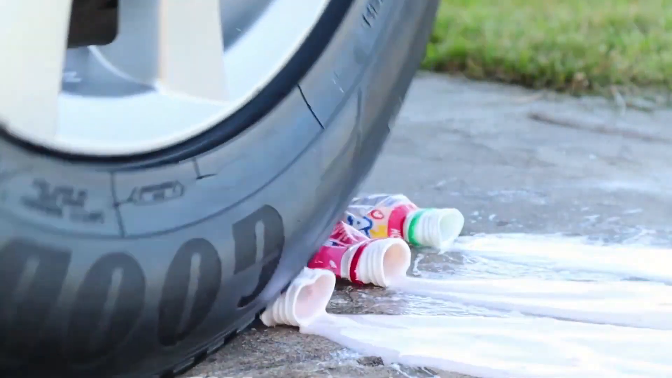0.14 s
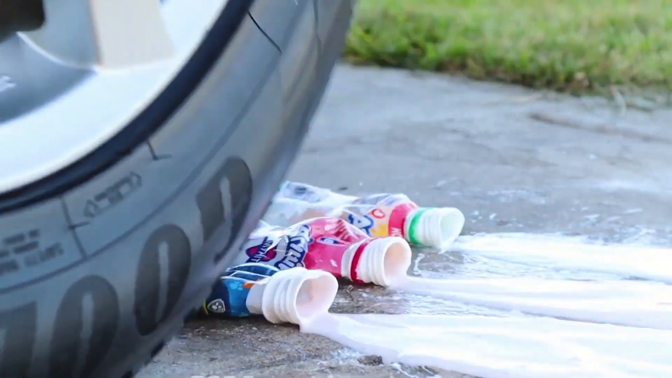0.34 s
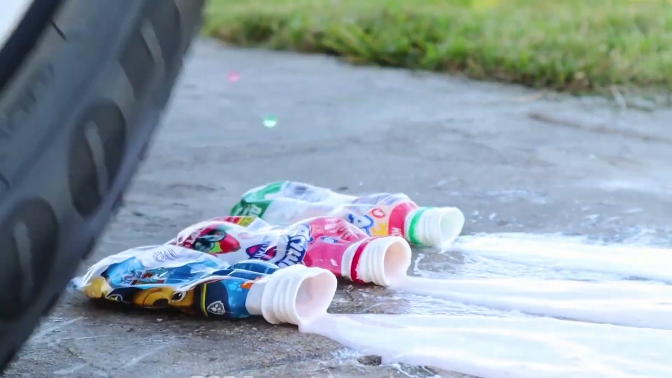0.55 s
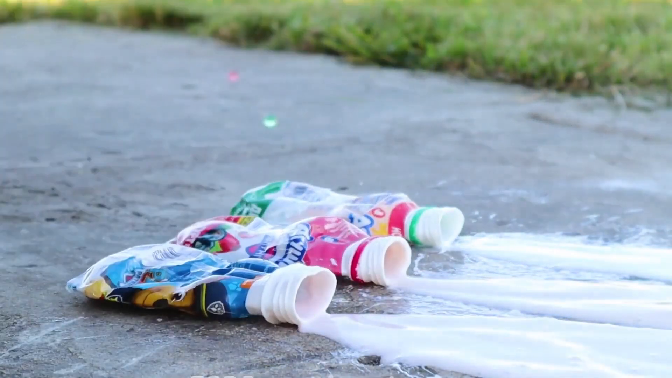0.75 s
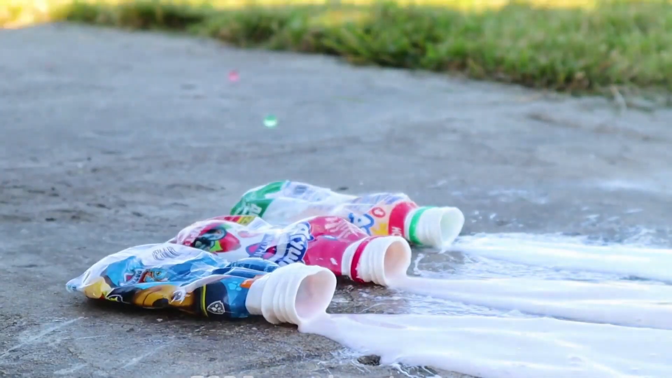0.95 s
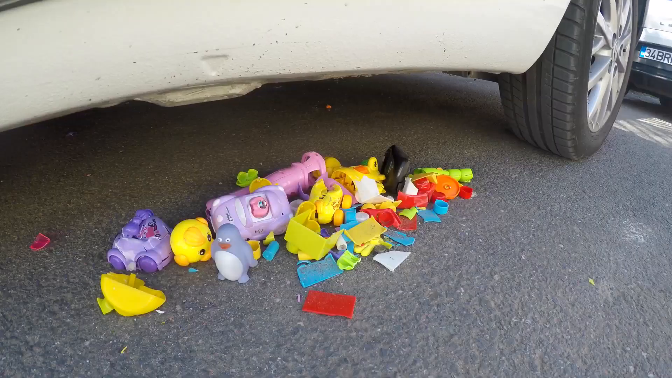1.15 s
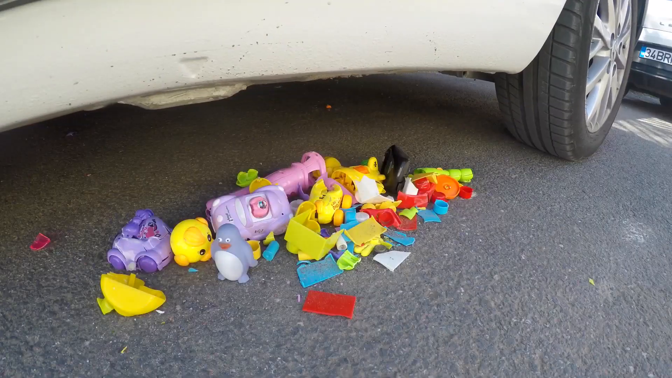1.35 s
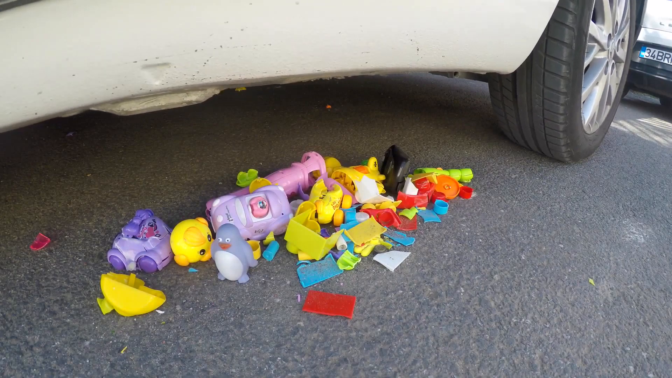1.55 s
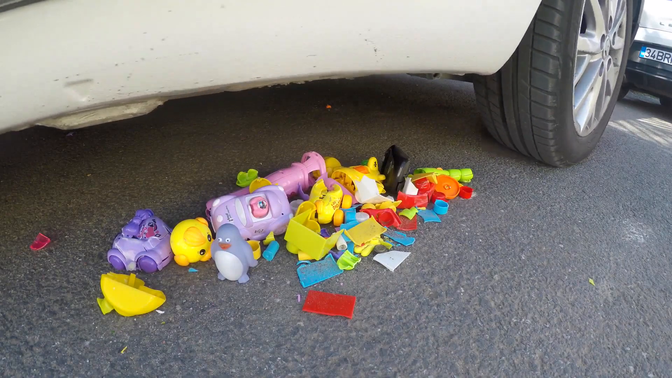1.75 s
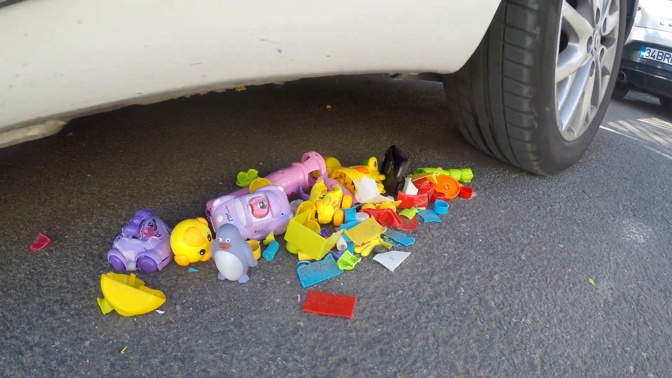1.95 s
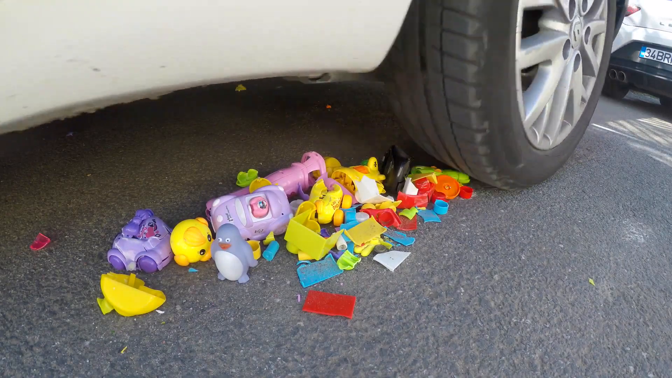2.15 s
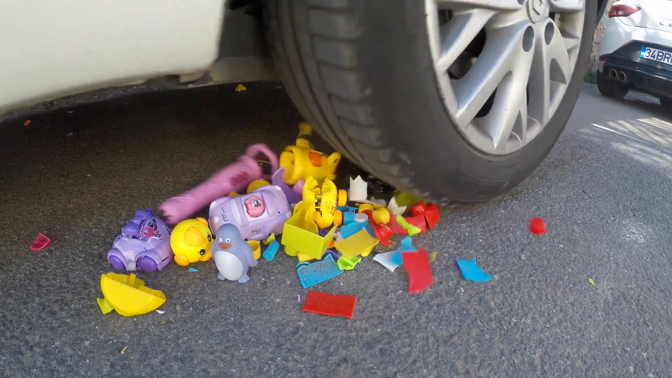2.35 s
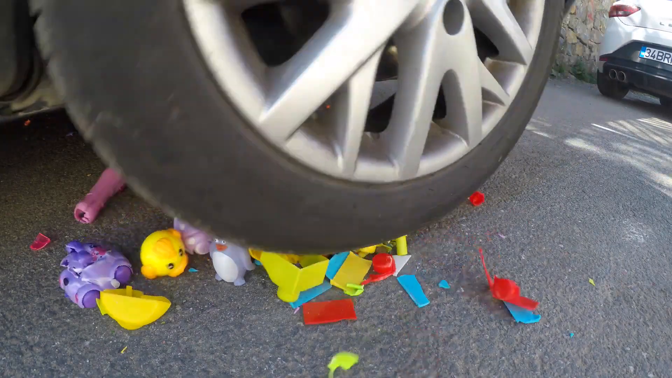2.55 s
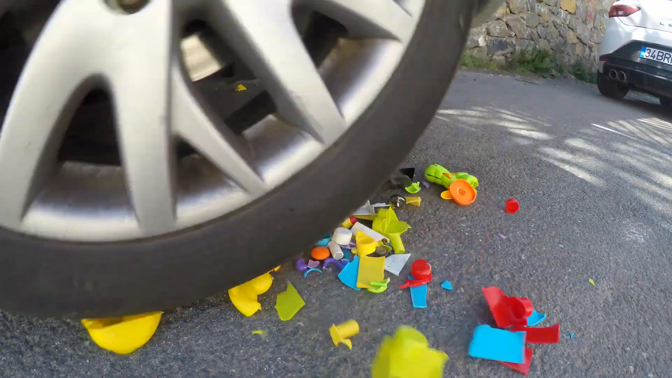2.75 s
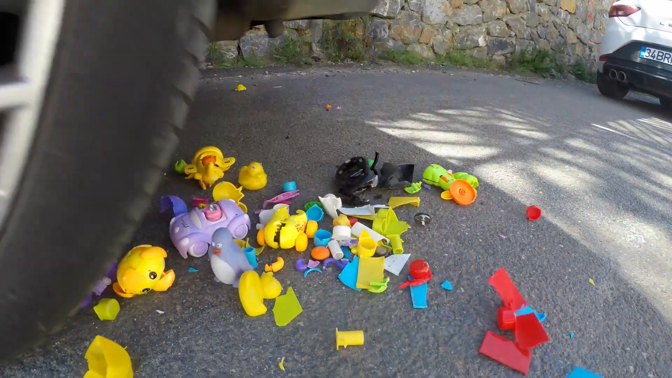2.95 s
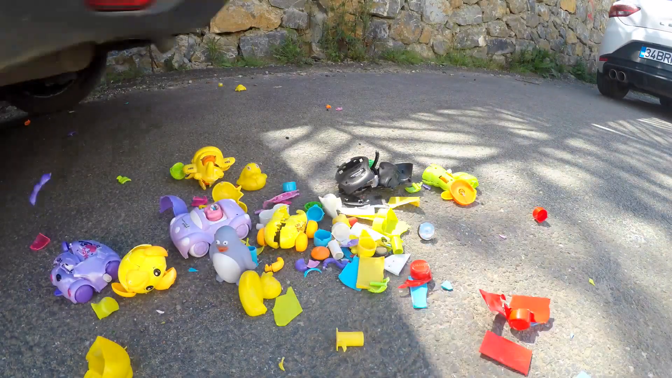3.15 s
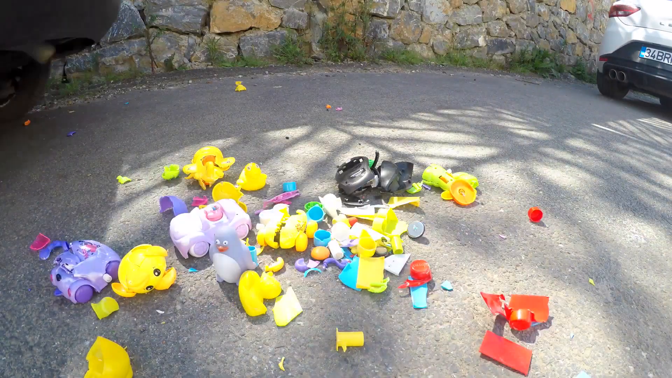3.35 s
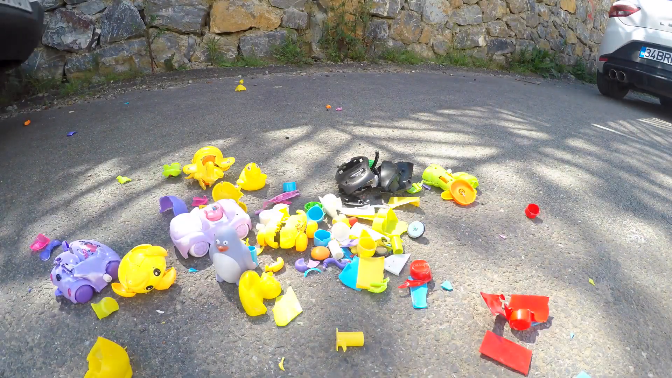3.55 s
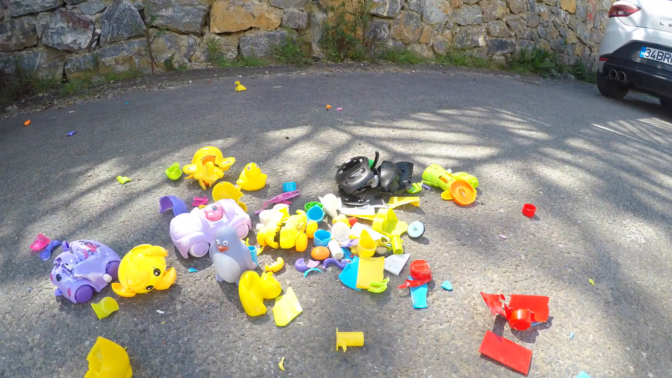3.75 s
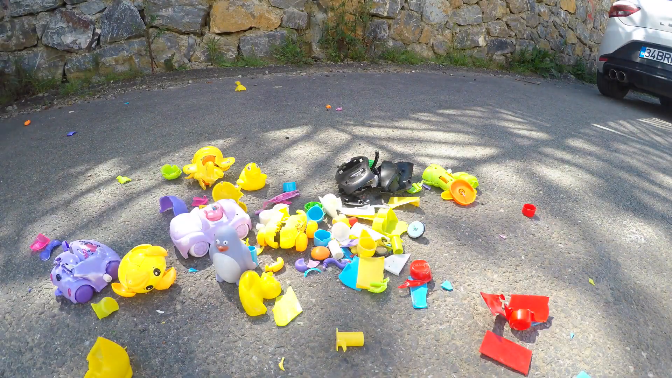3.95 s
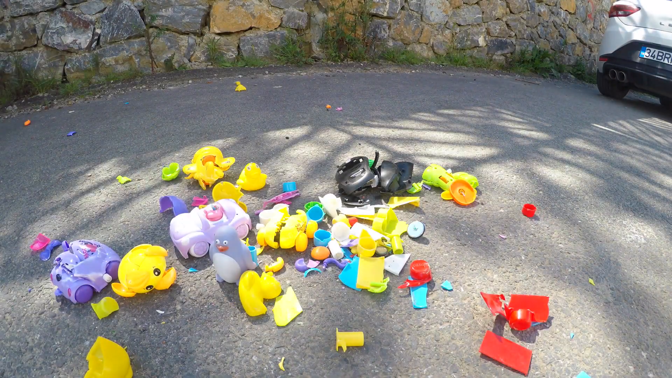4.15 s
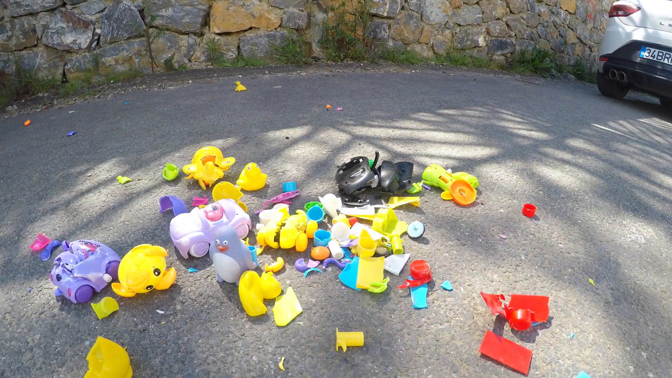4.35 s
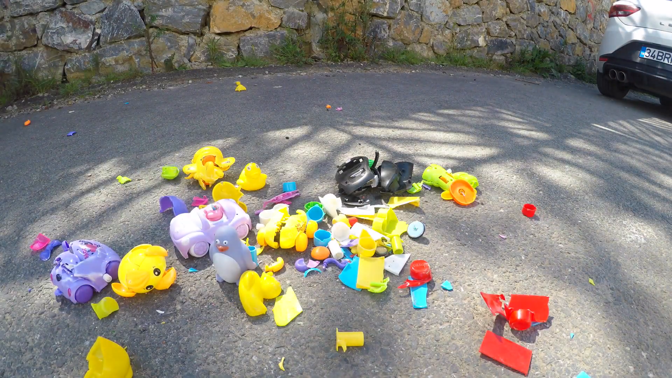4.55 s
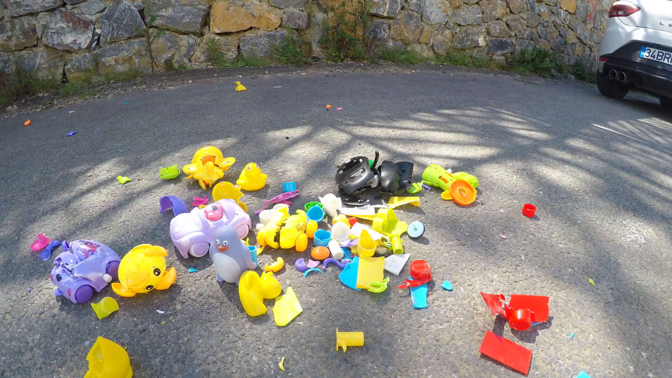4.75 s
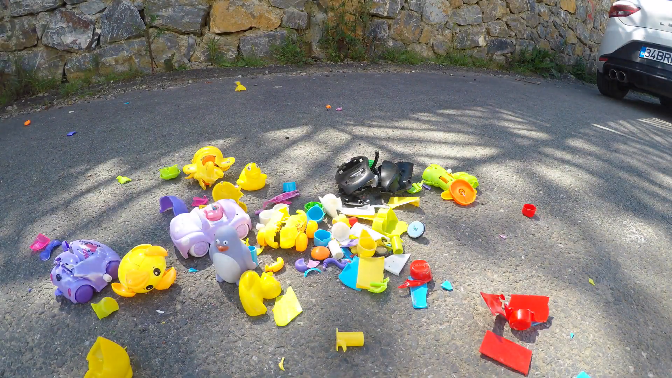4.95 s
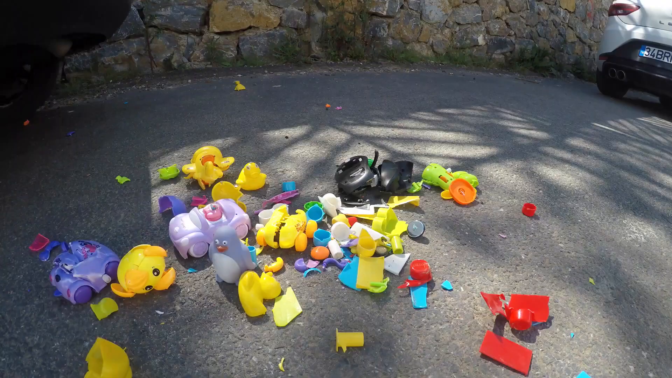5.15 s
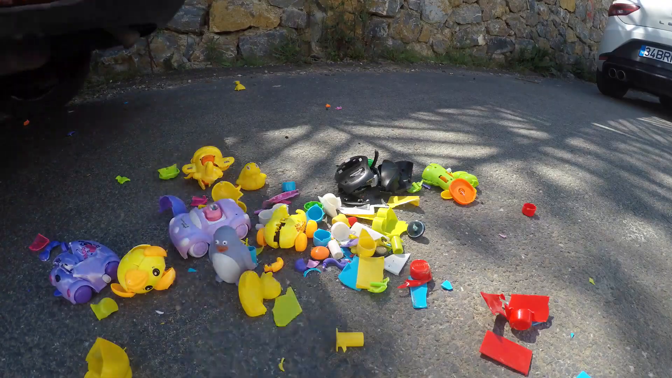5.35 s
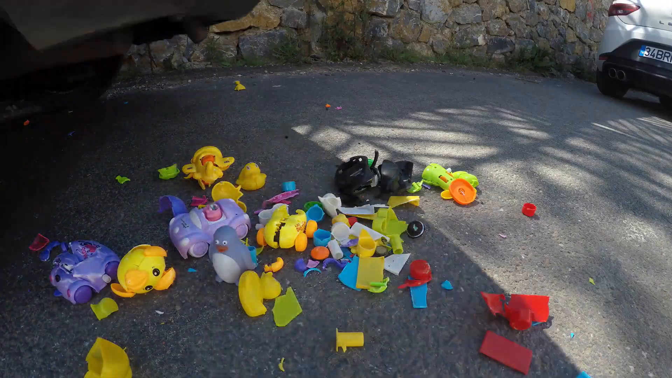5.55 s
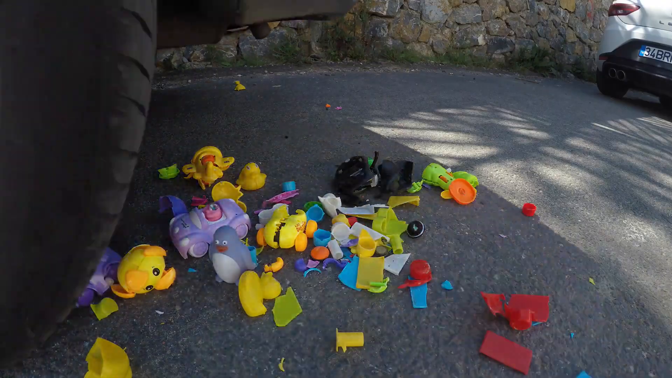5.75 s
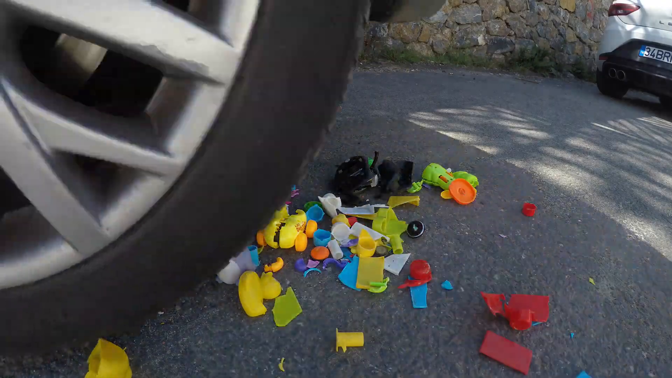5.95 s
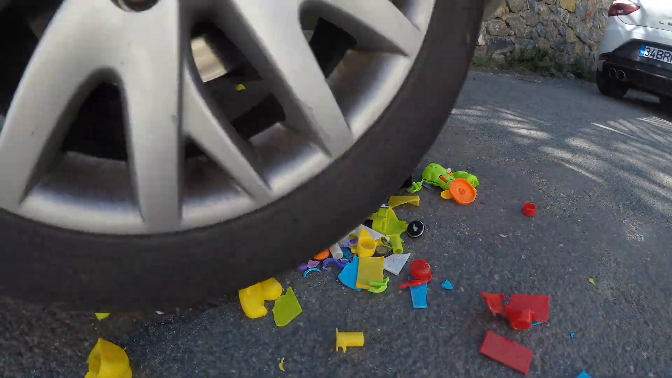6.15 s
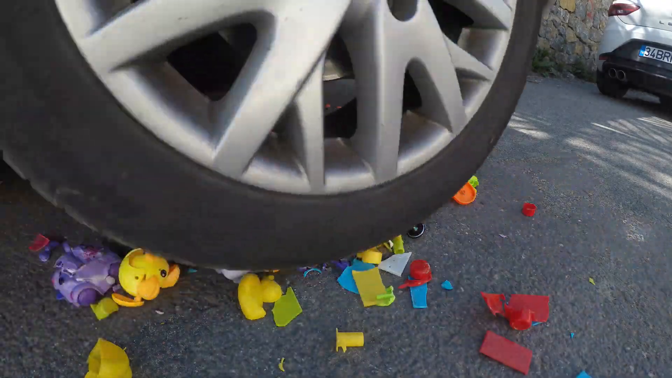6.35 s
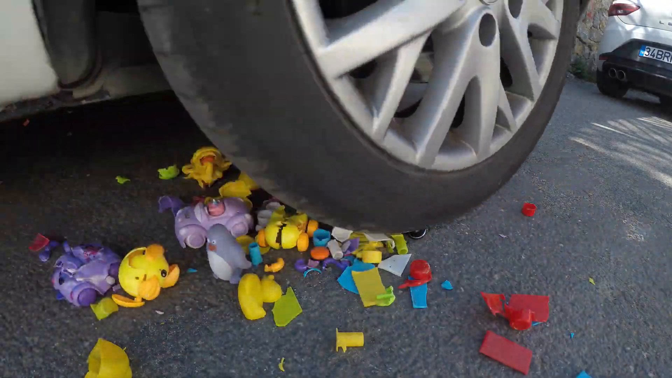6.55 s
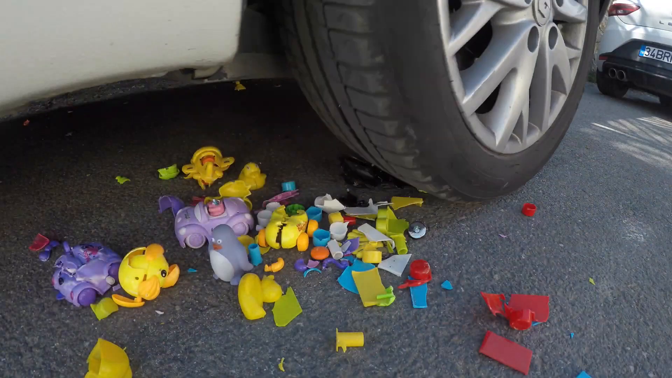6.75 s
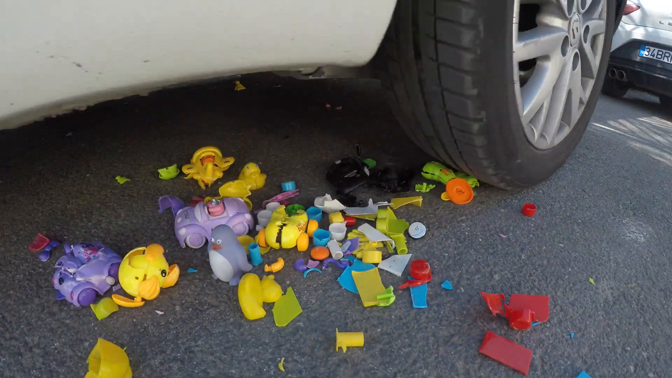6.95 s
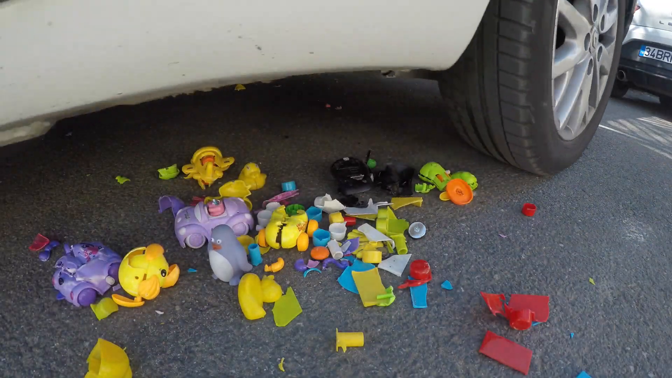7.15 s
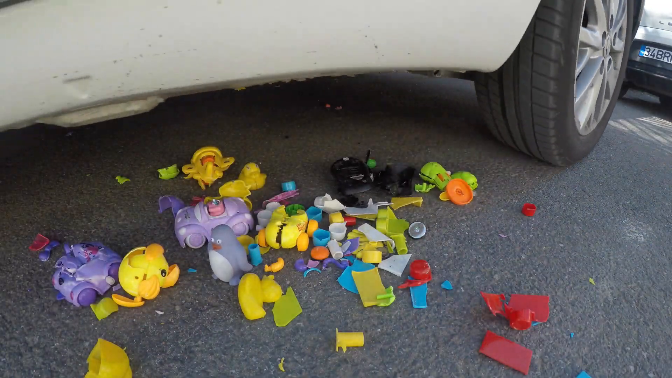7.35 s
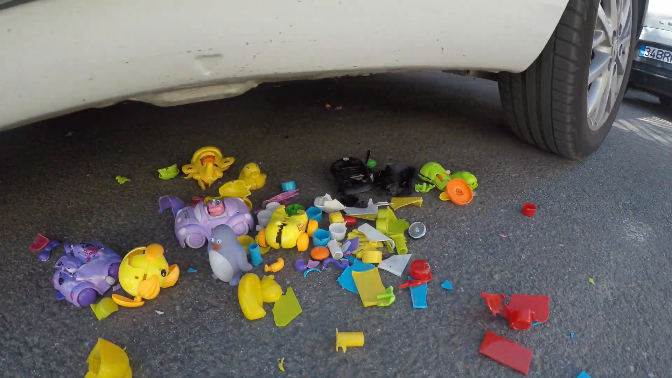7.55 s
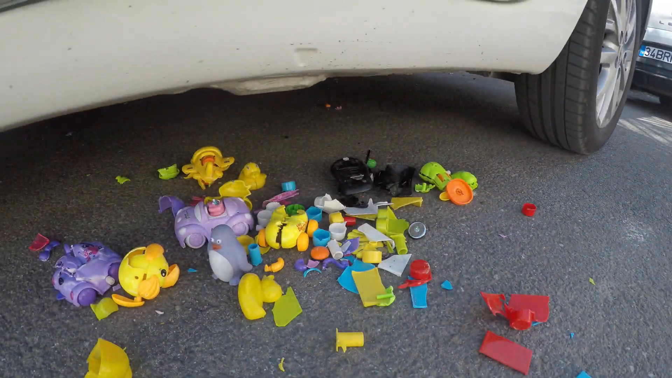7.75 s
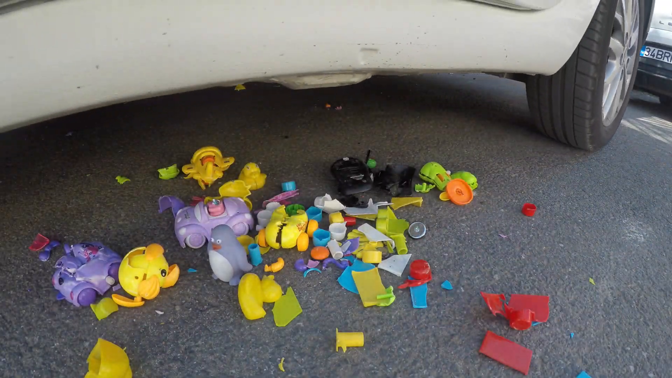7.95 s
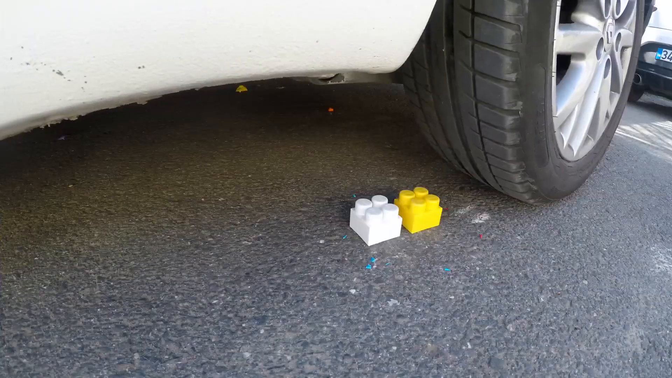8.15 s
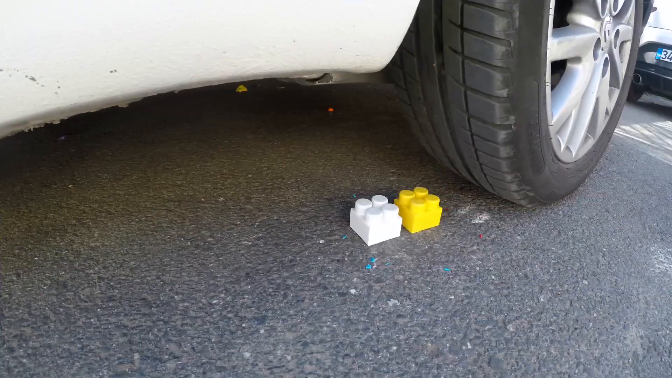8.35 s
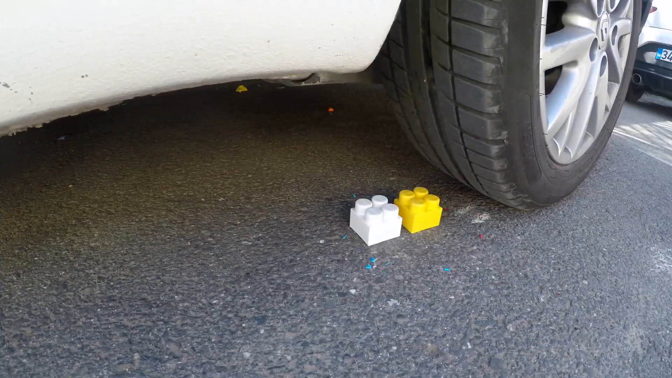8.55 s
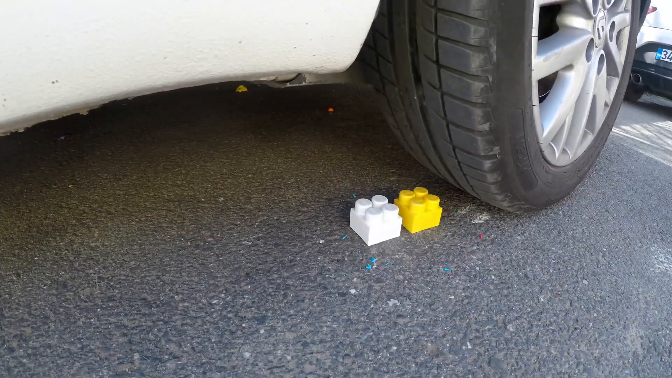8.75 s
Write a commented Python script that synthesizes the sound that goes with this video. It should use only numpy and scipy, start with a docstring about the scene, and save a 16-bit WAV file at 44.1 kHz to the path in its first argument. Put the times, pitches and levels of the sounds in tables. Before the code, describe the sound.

Hard plastic cracks, snaps and crunches under a slow car tyre on asphalt, with hollow thuds, skipping shards and faint idling engine between passes.

```python
"""Hard plastic toys crack and crunch under a car tyre: snaps, knocking shells, thuds, pops and skipping shards.
First the tyre rolls off flattened drink bottles on wet asphalt; in three further cuts, parted by brief
silences, an idling car rolls over a heap of toys and back again. Fractures are noise bursts and short
rings; hollow pieces are dying sines; exhaust puffs are pulses ringing the pipe; engine clatter, grit, wet
fizz and street are coloured noise. The toys, tyre and engine reach two close microphone ports."""
import sys
import numpy as np
from scipy import signal
from scipy.fft import rfft, irfft, next_fast_len
from scipy.io import wavfile
from scipy.ndimage import uniform_filter1d

SR = 44100
rng = np.random.default_rng(int(sys.argv[2]) if len(sys.argv) > 2 else 0)


def generate_wav(sig):
    """Save sig (samples, or channels by samples) to the path in sys.argv[1] as 16-bit PCM at SR."""
    pcm = np.round(np.clip(np.atleast_2d(sig).T, -1, 1) * 32767).astype(np.int16)
    wavfile.write(sys.argv[1], SR, pcm)


N = 388962

# The cuts that sound. Each row: start in seconds, end in seconds.
SHOTS = [(-.1, 1.121), (1.157, 5.157), (5.165, 7.985), (8.03, 9.01)]
CYCLE_S = .1024  # one engine cycle, three firings


def amp(db):
    """Decibels to amplitude."""
    return 10 ** (np.asarray(db) / 20)


def evened(x):
    """Scales each row to an RMS of one."""
    return x / np.sqrt(np.mean(x ** 2, -1, keepdims=True) + 1e-20)


def read(points, hz):
    """Reads a table of (Hz, value) along a logarithmic frequency axis."""
    f, value = np.transpose(points)
    return np.interp(np.log(hz + 1), np.log(f + 1), value)


def curves(tables):
    """A softened on/off gate over the tables' time spans, then each table column at every sample."""
    t, rows = np.arange(N) / SR, np.concatenate(tables)
    on = sum((t >= table[0][0]) & (t < table[-1][0]) for table in tables)
    columns = [np.interp(t, rows[:, 0], column) for column in rows.T[1:]]
    return uniform_filter1d(on * 1., 400), *columns


def colour(x, gain):
    """Filters by a gain given as a function of frequency."""
    size = next_fast_len(x.shape[-1])
    shaped = rfft(x, size) * gain(np.fft.rfftfreq(size, 1 / SR))
    return irfft(shaped, size)[..., :x.shape[-1]]


def lowpass(hz, corner_hz):
    """Gain that falls steeply above the corner."""
    return 1 / (1 + (hz / corner_hz) ** 4)


def ring(x, hz, width):
    """Two-pole resonance, its width in Hz."""
    r = np.exp(-np.pi * width / SR)
    return signal.lfilter([1, 0, -1], [1, -2 * r * np.cos(2 * np.pi * hz / SR), r * r], x)


def splinters(hz, noise, width):
    """Noise ringing through two equal resonances in a row; each width is a share of the pitch."""
    return evened(ring(ring(noise, hz, width * hz), hz, width * hz))


def blip(t, hz, rise):
    """A tone that swells to its top over some cycles and soon dies."""
    u = t * hz / max(rise, .2)
    return u ** 2 * np.exp(2 - 2 * u) * np.sin(2 * np.pi * hz * t)


def place(x, pan_db):
    """Pans by a left-right level difference."""
    return x * amp(np.array([pan_db / 2, -pan_db / 2]).reshape(2, -1))


def add(mix, s, sound):
    """Adds a sound to the mix at a time in seconds."""
    part = mix[:, max(round(s * SR), 0):][:, :sound.shape[1]]
    part += sound[:, :part.shape[1]]


def sparse_hits(per_s, spread_db):
    """Single-sample hits at random times and of uneven size."""
    return amp(spread_db * np.minimum(rng.exponential(1, N), 4)) * (rng.random(N) < per_s / SR)


def grains(per_s, spread_db, t60, wash):
    """Sparse snaps of uneven size, each a dying burst of noise, over a steady wash."""
    hits = sparse_hits(per_s, spread_db)
    burst = signal.oaconvolve(hits, amp(-60 * np.arange(2000) / SR / t60))[:N]
    return (evened(burst) + wash) * rng.standard_normal(N)


def chips(per_s, spread_db, lo_hz, hi_hz, cycles, count):
    """Sparse fractures of uneven size; each rings one of several small pieces for a few cycles."""
    hits = sparse_hits(per_s, spread_db) * rng.choice([-1, 1], N)
    piece = rng.integers(0, count, N)
    total = 0
    for k, hz in enumerate(np.geomspace(lo_hz, hi_hz, count)):
        total = total + evened(ring(hits * (piece == k), hz, hz / cycles)) * np.sqrt(hz)
    return evened(total)


def patchy(x, depth_db):
    """Random louder and softer patches, some 400 Hz by 40 ms."""
    z = signal.stft(x, nperseg=512)[2]
    patches = uniform_filter1d(rng.standard_normal(z.shape), size=5, axis=0)
    patches = uniform_filter1d(patches, size=7, axis=1)
    return signal.istft(z * amp(depth_db * patches / np.std(patches)), nperseg=512)[1][:N]


def crunchy(x, s, lo_hz):
    """Colour of breaking plastic at time s: whole pieces early on, fragments later."""
    # Spectra of whole pieces splitting and of fragments. Each row: frequency in Hz, density in dB per Hz.
    whole_spectrum = [(530, -36.5), (900, -8), (1850, 0), (2220, -11), (3040, -2), (4860, -3.5),
                      (6480, -0.5), (11400, -24), (13500, -24), (16000, -50)]
    fragment_spectrum = [(880, -28), (1500, -7), (1780, 8), (2230, -9), (2720, -17.5), (3060, -4),
                         (6500, -0.5), (11400, -27.5), (13500, -19), (14800, -28.5), (16000, -60)]
    whole_until_s = 4

    def broken(spectrum):
        return evened(colour(x, lambda hz: amp(read(spectrum, hz)) / (1 + (lo_hz / (hz + 1)) ** 6)))

    return np.where(s < whole_until_s, broken(whole_spectrum), broken(fragment_spectrum))


def street():
    """Faint steady outdoor murmur: coloured noise."""
    # Murmur spectrum. Each row: frequency in Hz, density in dB per Hz.
    murmur = [(15, -47.5), (25, -17.5), (90, -0.5), (247, 0), (385, -13), (645, -11.5), (1060, -17),
              (1950, -13.5), (2760, -28.5), (9000, -37.5), (11700, -64), (19800, -120)]
    level_db = -76.5
    return amp(level_db) * evened(colour(rng.standard_normal(N), lambda hz: amp(read(murmur, hz))))


def exhaust():
    """Each cycle one strong suction pulse that sets the pipe ringing; two weaker firings follow."""
    # First strong puff in each cut with the engine running, in seconds.
    first_puffs = [1.174, 5.2342, 8.0496]
    # Puff strength over time. Each row: time in seconds, level in dB.
    strength = [(1.15, -91.5), (1.17, -56), (1.58, -46), (1.89, -35), (2.1, -54.5), (3.1, -60.5),
                (3.64, -55), (3.73, -43.5), (4.14, -40.5), (4.55, -47), (4.68, -38.5), (5.1, -42.5),
                (5.2, -78.5), (5.55, -72), (5.9, -43), (7.0, -45), (7.95, -43), (8.04, -83.5), (8.68, -67),
                (8.76, -53)]
    pipe_hz, pipe_t60_s, pipe_ring_db = 104, .06, -6
    strong_spread_db, weak_db, weak_spread_db = 3.5, -21, 4.5
    rumble_db = -21.5  # gas rumbling in the pipe, against the puff level

    out, from_puff = np.zeros((1, N)), np.arange(-441, 2600) / SR
    u, after = from_puff / .0019, np.maximum(from_puff, 0)
    suction = (.5 * u ** 2 - 1.2) * np.exp(-u ** 2 / 2)
    pipe = np.exp(-after * 400) - np.cos(2 * np.pi * pipe_hz * after)
    pulse = (suction + amp(pipe_ring_db - 60 * after / pipe_t60_s) * pipe)[None]

    times = np.concatenate([np.arange(s, end, CYCLE_S) for s, (_, end) in zip(first_puffs, SHOTS[1:])])
    # the pulse centre lies 441 samples after its start
    for s, uneven in zip(times - 441 / SR, rng.standard_normal((len(times), 3))):
        db = np.interp(s, *np.transpose(strength))
        add(out, s, amp(db + strong_spread_db * uneven[0]) * pulse)
        for k in (1, 2):
            add(out, s + k * CYCLE_S / 3, amp(db + weak_db + weak_spread_db * uneven[k]) * pulse)
    rumble = evened(ring(ring(rng.standard_normal(N), 90, 170), 90, 170))
    return out[0] + amp(np.interp(np.arange(N) / SR, *np.transpose(strength)) + rumble_db) * rumble


def engine():
    """Valve and combustion clatter ringing the underbody, throbbing with the firings; grit under the slow tread."""
    # One table a stretch between passes. Each row: time in seconds, clatter level in dB,
    # left-right difference in dB, grit hiss level in dB.
    idle = [
        [(1.157, -42, 1, -63), (1.323, -41.5, -2.5, -65), (1.573, -42.5, 7, -68.5), (1.799, -41, 12, -64),
         (2.019, -40.5, 11.5, -56.5), (2.1, -46, 16, -64)],
        [(2.98, -53.5, -3, -49), (3.08, -77.5, 14, -67), (3.26, -80, 7.5, -91), (3.32, -78, 2, -99),
         (3.75, -70.5, -5, -71.5), (4.16, -58, -5, -61.5), (4.5, -58.5, -5.5, -72), (4.96, -63.5, 11, -74.5),
         (5.16, -65.5, 8, -74)],
        [(5.19, -101.5, -0.5, -98), (5.604, -79, 1.5, -89.5), (5.7, -63.5, 0, -96)],
        [(6.98, -49, 12.5, -74), (7.164, -52.5, 22, -68.5), (7.406, -46, 18.5, -65), (7.426, -47.5, 20.5, -65),
         (7.818, -46, 15.5, -59.5), (7.985, -50, 25.5, -61.5)],
        [(8.03, -83, -1, -88.5), (8.262, -77, 1, -87.5), (8.718, -61.5, -2, -81), (8.82, -65, -1, -79)],
    ]
    # Clatter and grit spectra. Each row: frequency in Hz, density in dB per Hz.
    clatter_spectrum = [(24, -49.5), (40, -22), (108, -20.5), (182, -17.5), (270, -13.5), (464, -9.5),
                        (614, -5.5), (727, -5.5), (829, -6.5), (999, -20), (1180, -23), (1450, -27),
                        (1890, -22.5), (2190, -34), (3500, -44), (4550, -70.5), (7700, -120)]
    grit_spectrum = [(1290, -44.5), (2200, -13.5), (3230, -4), (4720, -12.5), (5280, -8.5), (7160, -13),
                     (8550, -23), (13800, -37.5), (15000, -47)]
    # Underbody panels humming, then small parts pinging now and then.
    # Each row: frequency in Hz, resonance width in Hz, level in dB against the low clatter.
    hum_modes = [(253, 25, -13.5), (285, 25, -12.5), (613, 50, -8), (650, 60, -9.5), (811, 50, -12.5)]
    ping_modes = [(1185, 51, -20), (1780, 250, -18.5), (2020, 150, -19.5), (3300, 730, -28)]
    # Ping level over time, weakest around the second toy pass's end. Each row: time in seconds, added level in dB.
    ping_level = [(2.1, 1), (3.0, 1), (5.7, 1.5), (7.0, -5.5), (8.0, -0.5), (8.05, -1)]
    # The tread dragging grit for a moment. Each row: start in seconds, length in seconds, level in dB.
    scuff_rows = [(1.78, 0.14, -44), (4.15, 0.18, -67.5), (7.75, 0.06, -70)]
    # Resonances of the scrape. Each row: frequency in Hz, resonance width in Hz, level in dB.
    scuff_modes = [(3200, 990, -0.5), (5300, 620, -8.5)]
    scuff_rise_s, scuff_fall_s = 0.023, 0.051
    grit_patches_db = 2.5

    t = np.arange(N) / SR
    _, db, pan_db, grit_db = curves(idle)
    throb = 1 + 0.062 * np.cos(2 * np.pi * 3 * t / CYCLE_S)
    clatter = patchy(throb * grains(90, 2.8, .05, 1.2), 2)
    # the one-sided part lies in the underbody's low resonances
    low = colour(clatter, lambda hz: amp(read(clatter_spectrum, hz)) * lowpass(hz, 1300))
    high = colour(clatter, lambda hz: amp(read(clatter_spectrum, hz))) - low
    level = amp(db) / np.std(low + high)
    steady = np.std(clatter) * rng.standard_normal(N)
    hum = sum(amp(d) * splinters(f, clatter + steady, w / f) for f, w, d in hum_modes)
    low = low + np.std(low) * hum
    pings = sum(amp(d) * splinters(f, grains(22, 4.4, 0.068, 0.15), w / f) for f, w, d in ping_modes)
    high = high + np.std(low) * amp(np.interp(t, *np.transpose(ping_level))) * pings

    grit = chips(3500, 3.0, 2200, 14000, 4.9, count=10) + .7 * rng.standard_normal(N)
    grit = colour(grit, lambda hz: amp(read(grit_spectrum, hz)))
    scuff = np.zeros(N)
    for s, length, d in scuff_rows:
        slopes = np.minimum((t - s) / scuff_rise_s, (s + length - t) / scuff_fall_s + 1)
        scuff += amp(d) * np.clip(slopes, 0, 1)
    scrape = .6 * evened(grit)
    for f, w, d in scuff_modes:
        scrape = scrape + amp(d) * splinters(f, grains(300, 2.0, 0.038, 1.0), w / f)
    gritty = amp(grit_db) * evened(patchy(grit, grit_patches_db)) + scuff * patchy(scrape, 1.2)

    sound = place(level * low, pan_db) + place(level * high, .5 * pan_db) + place(gritty, 0.23 * pan_db)
    return sound * (np.arange(N) > SHOTS[1][0] * SR)


def squeaks():
    """Thin, slightly rough gliding whistles that swell and fade."""
    # Each row: start in seconds, length in seconds, first pitch in Hz, last pitch in Hz, level in dB.
    squeak_rows = [(6.99, .11, 4030, 4010, -64), (8.045, .12, 3800, 2950, -82)]
    out = np.zeros((1, N))
    for s, length, first_hz, last_hz, db in squeak_rows:
        u = np.arange(0, 1, 1 / (SR * length))
        rough = 1 + .4 * evened(uniform_filter1d(rng.standard_normal(8000), 300))[:len(u)]
        whistle = np.sin(2 * np.pi * np.cumsum(first_hz + (last_hz - first_hz) * u) / SR)
        add(out, s, amp(db) * (np.sin(np.pi * u) * rough * whistle)[None])
    return out


def wet_road():
    """Fizz of spilt drink and a low rumble, the same on both channels; the treble rises at about 0.57 s."""
    # Wet tread peeling off the road. Each row: time in seconds, fizz level in dB,
    # level of the fizz's treble in dB, low wind and rumble level in dB.
    wet = [(0.0, -31, -49, -19), (0.044, -35, -71, -45.5), (0.33, -44, -58, -57), (0.398, -43.5, -61, -50),
           (0.55, -41, -58.5, -45), (0.585, -40.5, -47, -53), (0.936, -41, -48.5, -51.5),
           (1.114, -42, -49, -50), (1.13, -58, -64, -69)]
    # Fizz spectrum. Each row: frequency in Hz, density in dB per Hz.
    fizz_spectrum = [(59, -38.5), (100, -1.5), (328, -4.5), (442, -1.5), (634, 2), (736, -1.5), (8280, -10),
                     (11600, -19.5), (14100, -21), (15900, -21.5)]
    on, db, treble_db, low_db = curves([wet])
    fizz = patchy(colour(grains(1500, 4.0, 0.012, 1.2), lambda hz: amp(read(fizz_spectrum, hz))), 1.2)
    treble = colour(fizz, lambda hz: 1 / (1 + (4000 / (hz + 1)) ** 4))
    low = ring(ring(rng.standard_normal(N), 50, 50), 50, 50)
    return on * (amp(db) * evened(fizz - treble) + amp(treble_db) * evened(treble) + amp(low_db) * evened(low))


def shards():
    """A short pitched tick; then the piece rings on narrowly while a ragged rattle of its colour dies away."""
    # Loose shards ticking and settling, drops on the wet road; the ticks between 1.2 and 2.1 s are small engine
    # parts pinging. # Each row: time in seconds, level in dB, pitch in Hz, level of the following rattle in dB
    # against the tick.
    shard_rows = [(0.4947, -33.5, 2020, -22), (0.6633, -34, 6000, -15), (0.8263, -22, 8550, -34),
                  (0.365, -35, 9900, -28), (0.613, -26, 7540, -31), (0.866, -35, 3020, -30),
                  (0.97, -24.5, 4570, -25), (1.0404, -27.5, 4470, -27), (1.041, -30, 8300, -30),
                  (1.297, -43, 1900, -8), (1.507, -38.5, 1960, -10), (1.768, -38, 1950, -25),
                  (1.808, -35, 2020, -16), (1.886, -32, 1890, -16), (2.04, -40, 1900, -26),
                  (7.475, -55, 2420, -3), (1.3268, -42.5, 2070, -2), (1.655, -32.5, 2000, -51),
                  (3.108, -56, 1910, -7), (3.198, -45, 938, -3), (3.2427, -48.5, 5780, -1.5),
                  (3.2594, -22.5, 6280, -28.5), (3.334, -41, 5100, -15.5), (3.3473, -39, 6320, -35),
                  (3.311, -52, 6400, -38), (3.403, -50.5, 4750, -18.5), (3.414, -48, 6680, -28),
                  (3.423, -55, 4830, -22.5), (3.4558, -43, 4800, -18), (3.562, -53.5, 3910, -14),
                  (3.585, -35, 3770, -22), (3.586, -34.5, 5500, -25), (3.623, -39.5, 4900, -10),
                  (3.7427, -25, 4950, -22), (3.758, -37.5, 4700, -17), (3.813, -40, 1770, -18.5),
                  (3.863, -34, 4870, -15), (3.87, -36, 4600, -23), (3.941, -45, 3940, -17),
                  (4.0261, -30.5, 5050, -16.5), (4.128, -29, 4870, -19), (4.1824, -57, 1550, -1),
                  (4.4186, -43, 1880, -11), (4.655, -36, 6060, -28), (4.669, -44, 3080, -15),
                  (4.657, -49, 1780, -11), (4.7154, -46.5, 3570, -20), (4.818, -34, 1730, -26.5),
                  (4.912, -69, 5960, 1), (4.934, -50, 7030, -8), (4.965, -45.5, 4140, -5),
                  (4.974, -45.5, 3520, -1), (4.976, -46.5, 5650, -0.5), (4.84, -65.5, 7600, -1),
                  (5.243, -41, 3680, -36), (5.5254, -61, 1940, -8.5), (7.206, -33, 5650, -21.5)]
    snap_db = -11.5
    rattle_width, rattle_least_hz = .32, 550  # share of the pitch, but at least so many Hz

    out, t = np.zeros((2, N)), np.arange(6000) / SR
    soft = 1 - np.exp(-t / 0.00067)
    for (s, db, hz, rattle_db), raw in zip(shard_rows, rng.standard_normal((len(shard_rows), 3, 6000))):
        tick = amp(snap_db - 60 * t / 0.02) * soft * splinters(hz, raw[1], 0.67) + blip(t, hz, 3.2)
        lumps = 0.7 + 0.63 * np.abs(evened(uniform_filter1d(raw[1], size=200)))
        width = max(rattle_width, rattle_least_hz / hz)
        tone = splinters(hz, splinters(hz, raw[0], width), width) + 0.6 * splinters(hz, raw[2], 0.05)
        rattle = amp(rattle_db - 60 * t / 0.17) * soft * lumps * tone
        add(out, s, place(amp(db) * (tick + rattle), 0.09))
    return out


def drop():
    """A big hollow toy drops free right by the ports: one blow rings all its modes, each after its own delay."""
    # Modes of the hollow. Each row: frequency in Hz, level in dB, T60 in seconds, delay in seconds,
    # left-right difference in dB, lag of the left port in radians.
    drop_modes = [(45.4, -36, 0.33, 0.0083, 0, 1), (79, -32.5, 0.3, 0.0069, -4, 0.5),
                  (144.2, -8, 0.14, 0.00683, -5, 1.8), (247.5, -11, 0.19, 0.0028, -1, 3.5),
                  (390, -25.5, 0.18, 0.0039, -5, -1.5), (514, -11.5, 0.067, 0.00504, 8, -2.5),
                  (595, -3, 0.071, .001, -2.5, -2.5), (680, -21, 0.14, 0.00084, 10, -3),
                  (910, -16, 0.1, 0.00117, 1, -2.5), (1440, -22.5, 0.045, 0.00095, -4, 2)]
    drop_s = 2.941
    out, t = np.zeros((2, N)), np.arange(20000) / SR
    for hz, db, t60, delay, pan_db, lag in drop_modes:
        tone = np.sin(2 * np.pi * hz * t - np.array([[lag / 2], [-lag / 2]]))
        add(out, drop_s + delay, place(amp(db - 60 * t / t60) * (1 - np.exp(-t / 0.0022)) * tone, pan_db))
    return out


def pops():
    """Each slip rings a low and a high mode of the hollow for a moment."""
    # A hollow toy slipping in jerks under the tread, or tipping over. Each row: time in seconds, level in dB,
    # low mode in Hz, high mode in Hz, high mode level in dB against the low, left-right difference in dB.
    pop_rows = [(3.197, -38, 876, 1017, -3.5, 11), (5.7745, -21.5, 800, 2550, 3, -11),
                (5.787, -20, 840, 2550, 2, -6.5), (5.7975, -10.5, 820, 2550, -3.5, -6),
                (5.8025, -14, 830, 2500, -5, 6.5), (5.8105, -9.5, 810, 1750, -12, 9.5),
                (6.0755, -24, 740, 1800, 0, -4.5), (6.0795, -23.5, 740, 1800, 9.5, 1.5),
                (6.084, -24.5, 740, 1800, 1, 14.5), (6.091, -24.5, 740, 1780, 7.5, -10),
                (6.098, -14, 720, 1800, -7.5, -17), (6.1065, -27.5, 740, 1750, 9.5, 8.5),
                (6.119, -16.5, 750, 1800, 2, 12), (6.1258, -14.5, 735, 1800, -5.5, -26.5)]
    tail_db, tail_t60_s = -11, 0.051
    out, t = np.zeros((2, N)), np.arange(3000) / SR
    noise = rng.standard_normal((len(pop_rows), 3000))
    for (s, db, low_hz, high_hz, high_db, pan_db), raw in zip(pop_rows, noise):
        tail = splinters(low_hz, raw, 0.38) + amp(high_db) * splinters(high_hz, raw, 0.14)
        pop = blip(t, low_hz, 0.67) + amp(high_db) * blip(t, high_hz, 2.2)
        pop += amp(tail_db - 60 * t / tail_t60_s) * tail
        add(out, s, place(amp(db) * pop, pan_db))
    return out


def thuds():
    """Air in the tyre or a hollow shell rings low, a neighbour mode beating with it, over a rough buckling tail."""
    # Tyre and hollow toys thudding. Each row: time in seconds, level in dB, pitch in Hz,
    # left-right difference in dB, T60 in seconds (10 ms at least is used).
    thud_rows = [(0.018, -7.5, 247, -3, 0.065), (0.033, -15, 391, -5, 0.09), (0.085, -16, 283, -3, 0.05),
                 (0.171, -12, 767, 0, 0.022), (0.383, -20.5, 385, 0.0, 0.072), (0.39, -31, 584, 0.0, 0.22),
                 (0.398, -16.5, 355, 0.0, 0.044), (0.41, -21.5, 402, 0.0, 0.076),
                 (0.448, -32, 382, 1, 0.31), (0.498, -29, 366, 0.0, 0.056), (0.563, -27, 470, 0.0, 0.026),
                 (2.184, -20, 208, 5.5, 0.15), (2.25, -16.5, 280, 6, 0.12), (2.324, -6.5, 117, 2.5, 0.046),
                 (2.364, -12.5, 293.8, 13.5, 0.021), (2.423, -4.5, 325.5, 7.5, 0.021),
                 (2.534, -16.5, 414, 21, 0.025), (2.591, -28, 263, 22.5, 0.091),
                 (2.705, -10, 253, 6.5, 0.04), (2.742, -20.5, 160.6, 6.5, 0.091),
                 (2.855, -28, 840, 15, 0.032), (4.658, -32.5, 95.4, -3, 0.081),
                 (5.829, -9.5, 256, -2.5, 0.043), (5.988, -30, 547, 2, 0.12), (6.315, -21, 271, 0.5, 0.096),
                 (6.368, -19, 286, 2.5, 0.066), (6.47, -16.5, 306, 3, 0.073), (6.549, -20.5, 296, 3, 0.063),
                 (6.657, -29, 820, 16, 0.028), (6.708, -28, 650, 7, 0.068)]
    rough_db, rough_longer = -4, 1.5  # the tail's T60 is this many times the tone's
    out, t = np.zeros((2, N)), np.arange(8000) / SR
    nears, noise = rng.uniform(1.1, 1.6, len(thud_rows)), rng.standard_normal((len(thud_rows), 8000))
    for (s, db, hz, pan_db, t60), near, raw in zip(thud_rows, nears, noise):
        fall_db = -60 * t / max(t60, .01)
        tone = np.sin(2 * np.pi * hz * t) + 0.33 * np.sin(2 * np.pi * near * hz * t)
        rough = amp(rough_db + fall_db / rough_longer) * splinters(hz, raw, 0.63)
        add(out, s, place(amp(db) * (1 - np.exp(-t * hz / 1.1)) * (amp(fall_db) * tone + rough), pan_db))
    return out


def crunch():
    """Countless small fractures while the tread is on the plastic, with duller body and tyre rumble."""
    # One table a pass over the plastic. Each row: time in seconds, crunch level in dB,
    # duller body level in dB, tyre rumble level in dB.
    passes = [
        [(0.0, -54, -33, -27.5), (0.08, -47, -35, -47), (0.174, -54, -38.5, -40), (0.278, -43, -38.5, -45),
         (0.36, -67, -55, -47)],
        [(2.08, -59, -45.5, -56), (2.164, -31.5, -30.5, -52), (2.28, -23.5, -34.5, -36), (2.334, -29, -37, -30),
         (2.436, -27.5, -35, -39), (2.642, -29, -33.5, -44.5), (2.756, -40.5, -43.5, -41.5),
         (2.838, -29.5, -47, -58.5), (2.88, -37, -52.5, -60.5), (3.002, -69.5, -51.5, -75),
         (3.1, -70, -82, -62)],
        [(5.69, -65, -86, -81), (5.758, -52, -69.5, -35), (5.806, -71.5, -67, -52), (5.878, -42, -46, -31),
         (5.916, -59, -51.5, -36), (5.966, -32.5, -35, -45), (6.118, -41.5, -40.5, -40),
         (6.356, -36.5, -33.5, -46.5), (6.48, -31.5, -28, -26), (6.526, -36, -34, -29),
         (6.776, -41.5, -48, -47), (6.852, -37, -64, -39.5), (6.966, -44, -70, -74), (7.05, -93, -81, -63)],
    ]
    fine_patches_db = 2.2
    on, db, body_db, rumble_db = curves(passes)
    bits = chips(2300, 2.0, 1500, 13000, 18.0, count=30) + .5 * grains(370, 6.3, 0.046, 0.1)
    fine = evened(patchy(crunchy(bits, np.arange(N) / SR, 1300), fine_patches_db))
    body = evened(colour(chips(500, 1.5, 350, 2500, 2.1, count=8), lambda hz: lowpass(hz, 2100)))
    rumble = evened(ring(ring(grains(55, 4.5, 0.14, 1.0), 130, 250), 130, 250))
    return on * (amp(db) * fine + amp(body_db) * body + amp(rumble_db) * rumble)


def cracks():
    """A fracture builds, snaps and dies; the shell gives a few quick cycles; splinters hiss and freed pieces ring."""
    # Plastic breaking under the tread. Each row: time in seconds, splinter level in dB, splinter pitch in Hz,
    # shell pitch in Hz, shell level in dB against the splinters, left-right difference in dB,
    # T60 of the splinters in seconds (5 ms at least is used for the fall).
    crack_rows = [(0.029, -7.5, 4450, 1400, -6.5, -4, 0.012), (0.0339, -13.5, 4300, 1240, 2, 0, 0.011),
                  (0.089, -29.5, 3440, 1860, 16.5, -3, 0.012), (0.151, -25.5, 4450, 1030, -8, -0.5, 0.016),
                  (0.1632, -19.5, 7400, 1270, -5.5, 0.5, 0.012), (0.1716, -23.5, 4250, 1630, 15, -1, 0.007),
                  (0.191, -23, 3400, 2100, -3.5, 5, 0.028), (0.25, -24, 3090, 1880, 2, 0.0, 0.014),
                  (0.2723, -26.5, 4050, 785, -6, 0.0, 0.018), (0.3069, -27, 3740, 1010, -4, -2, 0.022),
                  (0.32, -31, 4440, 730, 3.5, 0.0, 0.018), (2.1015, -23.5, 2900, 2800, -1.5, -2, 0.39),
                  (2.1312, -13.5, 3280, 1490, -4, -2, 0.12), (2.1447, -2, 6200, 1940, -15, 1.5, 0.0044),
                  (2.1511, -8, 2870, 2800, -11.5, -13.5, 0.031), (2.158, -6.5, 5500, 2800, -19, 0.5, 0.01),
                  (2.1748, -9.5, 5490, 1060, -9, 4, 0.015), (2.1863, -9.5, 4500, 1560, -6, 4, 0.0098),
                  (2.2036, -11, 2930, 1050, -15, -1.5, 0.022), (2.217, -5, 4020, 2630, -18.5, -2, 0.03),
                  (2.2333, -5, 3860, 2450, -11.5, -2.5, 0.038), (2.2501, -1.5, 3230, 730, -11, 3, 0.077),
                  (2.277, -14.5, 5850, 1520, -12.5, 2.5, 0.02), (2.292, -9.5, 6340, 2940, -10, 2.5, 0.022),
                  (2.327, -14, 3300, 1500, -8.5, 0.5, 0.03), (2.3293, 1, 6370, 1500, -15, -1, 0.029),
                  (2.365, -5.5, 6390, 1150, -24, -2, 0.0096), (2.401, -3, 6000, 1770, -30, 4.5, 0.015),
                  (2.4228, -4.5, 6260, 1770, -9.5, -3, 0.023), (2.465, -20, 6000, 1770, -19.5, 16, 0.049),
                  (2.48, -14.5, 5840, 1970, -12, 18.5, 0.021), (2.492, -13, 3300, 1920, -10, -7, 0.013),
                  (2.5387, -13.5, 2980, 1730, 3.5, -4.5, 0.025), (2.555, -14, 6100, 2400, -13.5, 1, 0.013),
                  (2.567, -18, 6860, 2400, -6.5, 10.5, 0.011), (2.579, -28, 5200, 2400, 3.5, -11, 0.0086),
                  (2.5896, -6.5, 5900, 1320, -7.5, 0, 0.014), (2.5962, -6.5, 6800, 1490, -13, 0, 0.025),
                  (2.6143, -4.5, 3150, 1670, -11.5, -5, 0.015), (2.6753, -21, 4300, 740, 0.5, 3, 0.22),
                  (2.6986, -4, 6800, 2130, -7.5, -0.5, 0.026), (2.7057, -6.5, 6900, 2200, -17, 4.5, 0.02),
                  (2.7089, -4, 6600, 1580, -5.5, 0.5, 0.02), (2.7286, -17.5, 5770, 1820, -17, -5, 0.018),
                  (2.781, -23, 6400, 2630, -13, 9.5, 0.03), (2.805, -23.5, 3200, 1720, -5, 2.5, 0.047),
                  (2.824, -11.5, 5600, 820, -13, 9, 0.013), (2.834, -4, 6600, 2360, -20.5, -6, 0.016),
                  (2.8534, -14.5, 5820, 850, 0.5, 7.5, 0.018), (2.8813, -16.5, 4440, 760, -20, 11.5, 0.02),
                  (2.935, -24.5, 5800, 1300, -7, 10, 0.1), (2.9625, -17, 5840, 908, -13, 7, 0.043),
                  (3.0087, -34, 3500, 750, -14, 11, 0.025), (5.7194, -27, 4300, 2420, -17, 2, 0.14),
                  (5.736, -18, 5980, 1960, -14, 2.5, 0.12), (5.759, -26, 5550, 1720, 2.5, 17, 0.028),
                  (5.773, -21, 6060, 2510, -25, -4.5, 0.054), (5.7847, -18, 6400, 3700, -7.5, 2.5, 0.041),
                  (5.798, -9.5, 4250, 2500, -19, 0.5, 0.0077), (5.803, -10.5, 4100, 774, -23.5, -7, 0.018),
                  (5.809, -11, 5260, 1710, -7, 3, 0.044), (5.827, -9.5, 5300, 1680, -9.5, -5, 0.024),
                  (5.8316, -11, 4500, 1460, 5, 5, 0.029), (5.885, -24, 4470, 804, 6.5, 3, 0.033),
                  (5.893, -21, 5000, 900, -6, -2.5, 0.056), (5.956, -28.5, 4540, 1530, 2.5, 1.5, 0.016),
                  (5.9899, -22.5, 5740, 1690, 3, 14.5, 0.014), (6.005, -15.5, 5830, 1700, 0.5, -1, 0.022),
                  (6.0238, -19, 3700, 820, -8, -8, 0.088), (6.054, -15, 5300, 760, -11.5, -5.5, 0.017),
                  (6.099, -21, 5700, 2430, 5.5, -4.5, 0.022), (6.118, -23.5, 5530, 2520, 0, 1, 0.026),
                  (6.155, -23.5, 5700, 1920, 5, 1.5, 0.025), (6.1848, -15.5, 6050, 1840, -6.5, -5, 0.051),
                  (6.204, -19.5, 6660, 1940, -3, -9, 0.036), (6.2475, -8, 4540, 2440, -10.5, 1.5, 0.012),
                  (6.315, -18, 5160, 1740, 1, -4, 0.14), (6.3463, -9.5, 5550, 1760, -6, 9.5, 0.021),
                  (6.3615, -5.5, 5400, 1710, -9, -2, 0.047), (6.372, -12.5, 4200, 1420, -2.5, 0, 0.099),
                  (6.403, -25, 2990, 1440, 7, 0, 0.034), (6.425, -18.5, 5840, 1710, 8.5, -3.5, 0.037),
                  (6.4401, -24.5, 3180, 1950, 8.5, 2.5, 0.022), (6.477, -17.5, 3860, 744, 1.5, 5.5, 0.087),
                  (6.5001, -12, 5900, 1910, 3, -2.5, 0.087), (6.515, -16.5, 3500, 1820, 4.5, -6, 0.025),
                  (6.524, -7.5, 2950, 2920, -20, 0, 0.028), (6.53, -9, 3300, 730, -5, 5.5, 0.064),
                  (6.5407, -11, 4060, 1890, -8, -10, 0.024), (6.6125, -17, 3150, 1720, -6, -14, 0.028),
                  (6.652, -9, 5800, 1430, -11, 3, 0.025), (6.66, -6, 5130, 1540, -9.5, -3.5, 0.027),
                  (6.631, -16.5, 5040, 1880, -20, -2, 0.056), (6.6965, -18, 5040, 746, -3.5, 7.5, 0.024),
                  (6.7133, -9, 5210, 826, -12.5, 3, 0.021), (6.755, -25, 5200, 775, -7, 8, 0.074),
                  (6.794, -21.5, 5100, 765, -9, -1, 0.16), (6.823, -17, 5810, 2390, -33, 7, 0.013),
                  (6.8476, -9, 6350, 1080, -7.5, 4.5, 0.017), (6.864, -24.5, 3200, 6800, -16, 5, 0.0085),
                  (6.8808, -12.5, 6390, 1300, -6.5, -5.5, 0.029),
                  (6.9304, -22.5, 3300, 1100, -6.5, 0, 0.073), (6.9739, -17, 5820, 805, -36, -2, 0.038)]
    build_share = .1  # a crack builds for this share of its T60, kept within 1 to 4 ms
    knock_rise, ring_rise, ring_db = 1.1, 4.3, -7.5  # cycles to the top of shell knock and splinter ring
    snap_db, snap_t60_s, snap_rise_s, snap_top_hz = -1, 0.003, .0002, 9500
    tail_db, splinter_width = -18, .35  # width as a share of the pitch
    piece_db, piece_cycles = -10, 45  # a freed piece falls 60 dB in so many cycles

    out, t = np.zeros((2, N)), np.arange(3000) / SR
    noise = rng.standard_normal((len(crack_rows), 2, 3000))
    pieces = rng.uniform(.55, 1.5, (len(crack_rows), 3))  # pitches against the splinter pitch
    broad = crunchy(noise[:, 0], np.array(crack_rows)[:, :1], 1800)
    snaps = colour(broad, lambda hz: lowpass(hz, snap_top_hz))
    for row, wide, snap, raw, piece in zip(crack_rows, broad, snaps, noise[:, 1], pieces):
        s, db, hz, shell_hz, shell_db, pan_db, t60 = row
        build = np.clip(build_share * t60, .001, .004)
        late = np.maximum(t - build / 2, 0)
        shell = 1.3 * blip(late, shell_hz, knock_rise)
        shell += amp(-13.5 - 60 * t / 0.087) * splinters(shell_hz, raw[::-1], 0.77)
        fall = amp(-60 * (t / max(t60, .005))) + amp(tail_db - 60 * t / 0.15)
        fall *= 1 - np.exp(-(t / build) ** 2)
        hiss = fall * (0.4 * wide + 0.2 * splinters(hz, raw, splinter_width))
        hiss += amp(ring_db) * blip(late, hz, ring_rise)
        hiss += amp(snap_db - 60 * late / snap_t60_s) * (1 - np.exp(-late / snap_rise_s)) * snap
        for f in hz * piece:
            hiss += amp(piece_db - 60 * late * f / piece_cycles) * np.sin(2 * np.pi * f * late)
        add(out, s, place(amp(db) * (amp(shell_db) * shell + hiss), pan_db))
    return out


def ports(x):
    """The right port hears a share of the sound smeared by shifting nearby reflections; treble most, bass not."""
    # The nearer the wheel, the less alike the ports. Each row: time in seconds, likeness from 0 to 1.
    likeness = [(1.15, 1), (1.5, 0.96), (2.1, 0.64), (3.0, 0.58), (3.3, 0.99), (5.2, 1), (6.4, 1),
                (6.9, 0.72), (7.1, 0.3), (8.0, 0.48), (8.05, 1)]
    # Colour of the left port against the right. Each row: frequency in Hz, difference in dB.
    port_colour = [(1000, 1.5), (2500, 0), (4500, 0), (8500, 1.5), (12000, -4)]
    mono_hz, reflect_t60_s = 90, .006  # below mono_hz both ports hear the same

    t, deep = np.arange(N) / SR, colour(x, lambda hz: lowpass(hz, mono_hz))
    x = x - deep + deep.mean(0)
    x = np.array([colour(v, lambda hz: amp(way * read(port_colour, hz))) for v, way in zip(x, (.5, -.5))])
    same = np.clip(np.interp(t, *np.transpose(likeness)), 0, 1)
    taps = rng.standard_normal((3, 300)) * amp(-60 * np.arange(300) / SR / reflect_t60_s)
    # three reflection patterns take turns seven times a second
    other = np.zeros(N)
    for k, pattern in enumerate(taps):
        turn = np.sqrt(2 / 3) * np.cos(2 * np.pi * (7 * t + k / 3))
        other += turn * signal.oaconvolve(x[1], pattern / np.linalg.norm(pattern))[:N]

    def bass(hz):
        return 1 / (1 + (hz / 300) ** 2)

    def treble(hz):
        return 1 / (1 + (6500 / (hz + 1)) ** 4)

    def mid(hz):
        return 1 - bass(hz) - treble(hz)

    def blend(band, share):
        return share * colour(x[1], band) + np.sqrt(1 - share ** 2) * colour(other, band)

    return np.array([x[0], colour(x[1], bass) + blend(mid, same) + blend(treble, same ** 4.2)])


def scene():
    """All layers; in the bottle cut the close sounds are heard by a single microphone."""
    near = cracks() + pops() + crunch() + thuds() + shards() + engine()
    near = np.where(np.arange(N) < SHOTS[0][1] * SR, near.mean(0), ports(near))
    return near + drop() + squeaks() + exhaust() + wet_road() + street()


def record(dry):
    """Silence between the cuts, soft overload, then the band limit."""
    edge_hz = 15900
    t = np.arange(N) / SR
    gate = sum(np.clip((t - a) / 0.01, 0, 1) * np.clip((b - t) / 0.0024, 0, 1) for a, b in SHOTS)
    loud = 1.544 * np.tanh(dry * gate / 1.594)
    return signal.oaconvolve(loud, signal.firwin(511, edge_hz, window=("kaiser", 9), fs=SR)[None], "same")


dry = scene()
out = record(dry)
generate_wav(out)
```